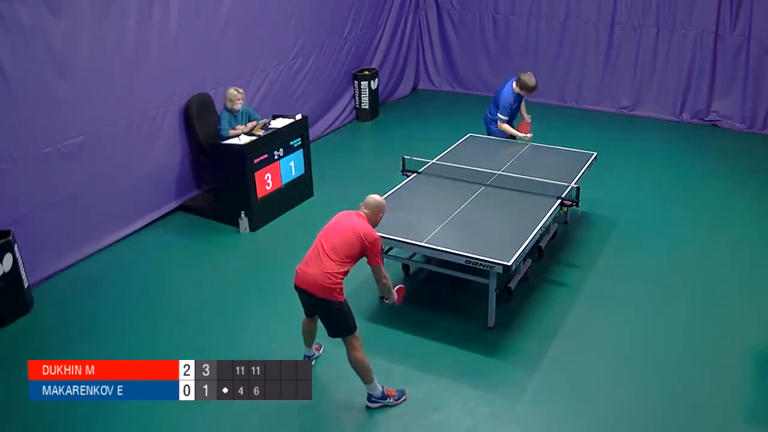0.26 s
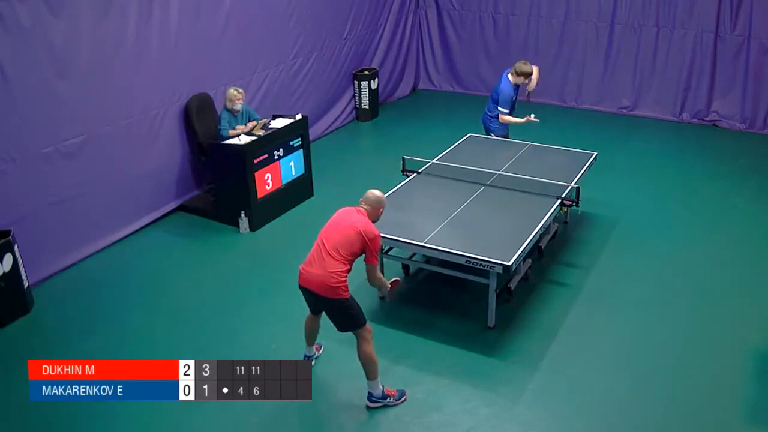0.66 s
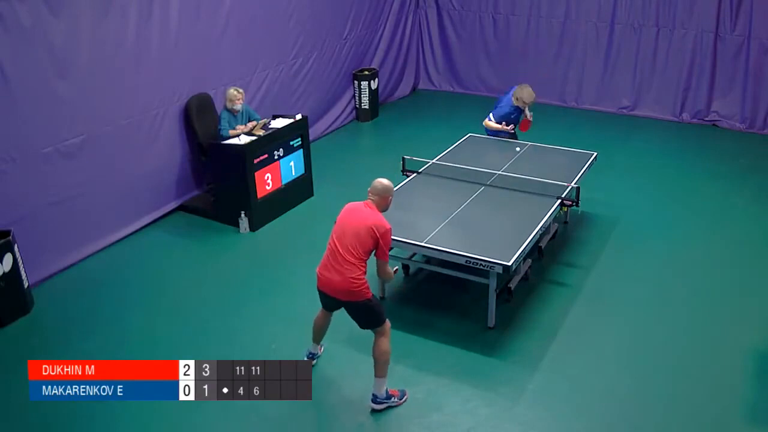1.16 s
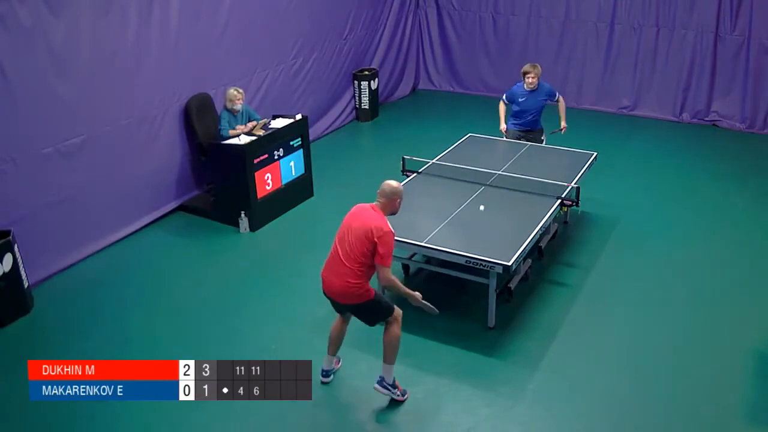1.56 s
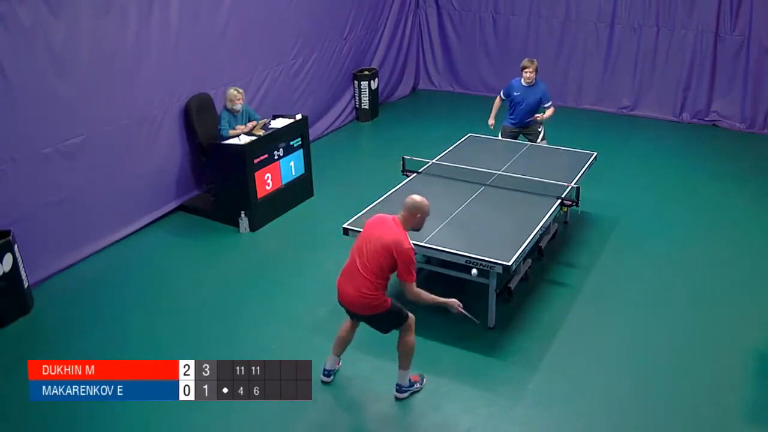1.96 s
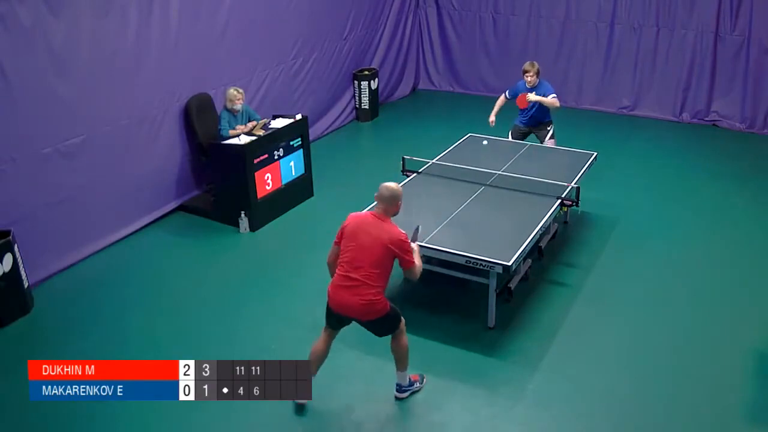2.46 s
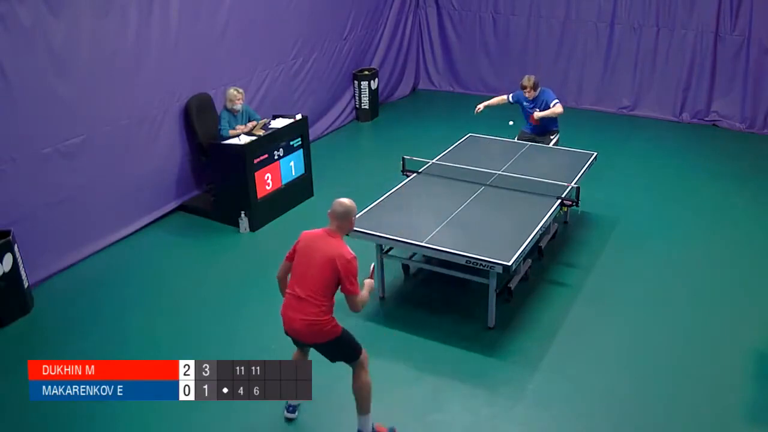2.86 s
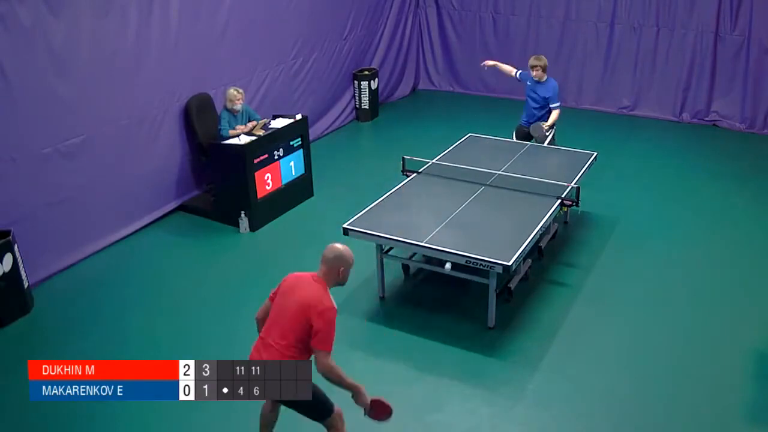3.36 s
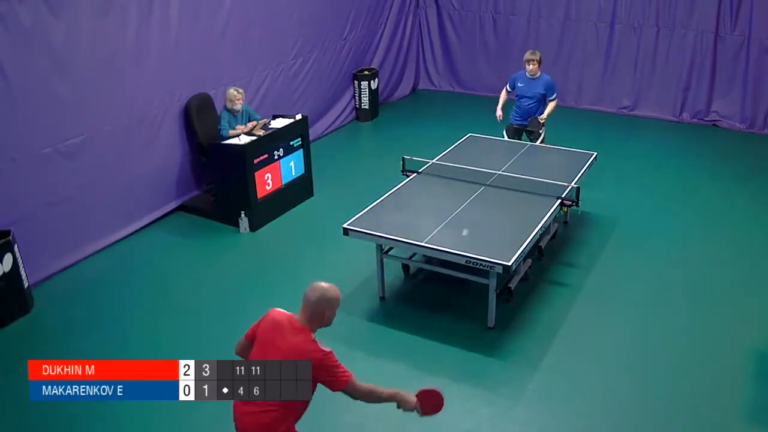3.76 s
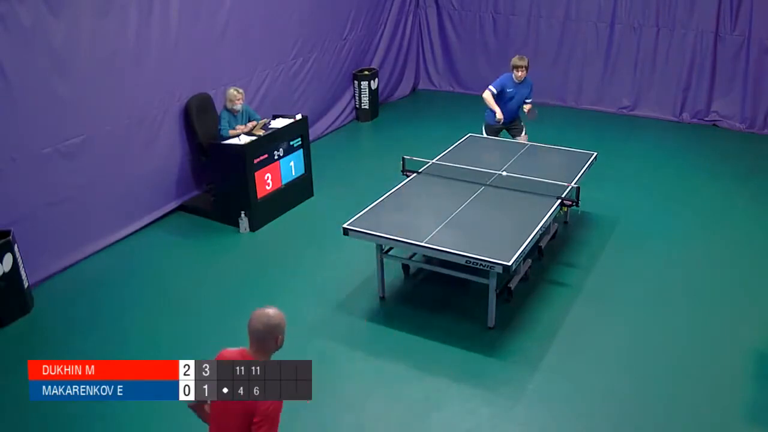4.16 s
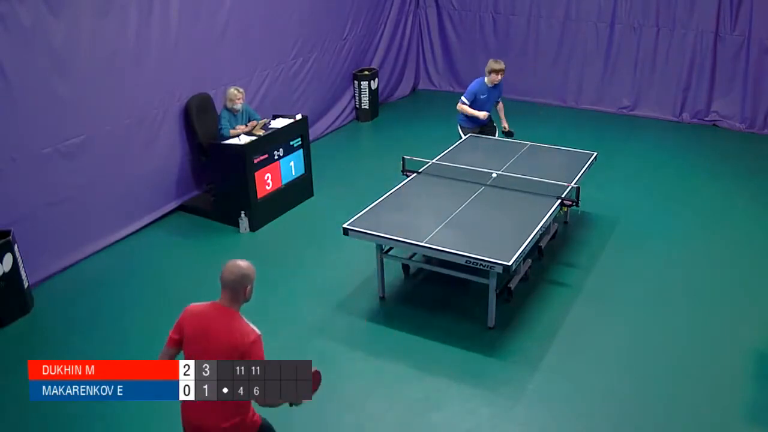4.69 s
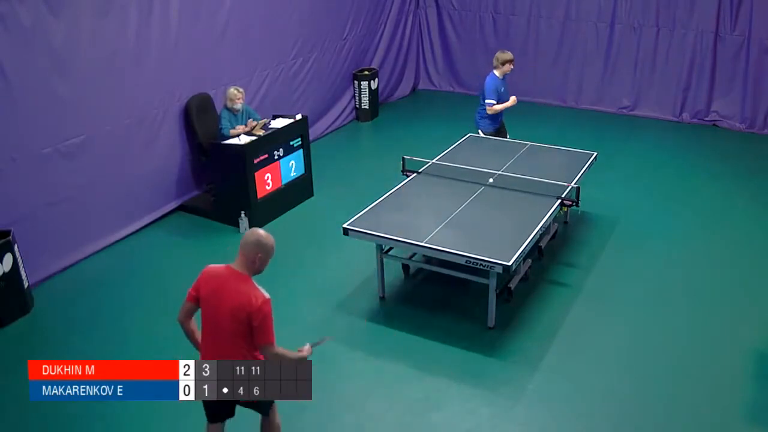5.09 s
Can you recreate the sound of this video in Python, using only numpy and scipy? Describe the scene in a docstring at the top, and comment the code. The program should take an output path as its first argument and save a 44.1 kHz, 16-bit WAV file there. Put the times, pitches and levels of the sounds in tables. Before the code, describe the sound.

In a reverberant sports hall with low ventilation rumble, soles brush faintly, then a soft serve tap is followed at once by a heavy stamp on sprung boards. The ball clicks on table and bats, strokes growing firmer, with short high rubber squeaks, scuffs and two light footfalls. After the last hard knock it bounces weakly on the table. The microphone is some distance away, slightly dull on top.

```python
"""A table tennis rally in a curtained sports hall, heard from above one corner over low ventilation rumble (noise).
Soles brush the floor (swells of noise), then the first bat stroke knocks (decaying sines) and the server
stamps on the sprung floor (ringing boards, slap and boom). The ball clicks between table and bats (decaying
sines with scattered reflections) amid squeaks (gliding tones), scuffs and light thumps of rubber soles.
After the last stroke it bounces out on the table top, with a last squeak and scuff."""
import sys
import numpy as np
from scipy import signal
from scipy.fft import rfft, irfft
from scipy.io import wavfile

SR = 44100
rng = np.random.default_rng(int(sys.argv[2]) if len(sys.argv) > 2 else 0)


def dump_mix(stems):
    """Bounce the given channels to the path in sys.argv[1] as a 16-bit WAV at rate SR."""
    frames = np.atleast_2d(stems).T  # one column per channel
    limited = np.clip(frames, -1, 1)  # hard clip at full scale
    pcm = np.round(limited * 32767).astype(np.int16)
    wavfile.write(sys.argv[1], SR, pcm)


N = 234900
T = np.arange(N) / SR


def from_db(db):
    """Decibels to gain."""
    return 10 ** (np.asarray(db) / 20)


def at_hz(points, hz):
    """Read a table on a log-frequency axis."""
    f, value = np.transpose(points)
    return np.interp(np.log(np.maximum(hz, 1)), np.log(f), value)


def noise(spectrum, tilt_db=0):
    """Noise of a given colour, tilted by dB per octave and scaled to rms 1."""
    hz = np.maximum(np.arange(N // 2 + 1) * SR / N, 1)
    gain = from_db(at_hz(spectrum, hz) + tilt_db * np.log2(hz))
    x = irfft(rfft(rng.standard_normal(N)) * gain, N)
    return x / x.std()


def wobble(size, rate_hz):
    """Random points of spread 1 joined by straight lines; the last of the 400 points is held."""
    return np.interp(T[:size] * rate_hz, np.arange(400), rng.standard_normal(400))


def add(track, s, sound):
    """Mix a sound in at a time."""
    at = max(round(s * SR), 0)
    track[at:at + len(sound)] += sound[:N - at]


def ring(modes):
    """Decaying sines of a struck body, alternating in polarity."""
    t = T[:SR // 3]
    total = 0
    for k, (hz, db, t60) in enumerate(modes):
        total = total + from_db(db - 60 * t / t60) * np.sin(2 * np.pi * hz * t) * (-1) ** k
    return total


def burst(s, rise, t60):
    """Envelope that swells and dies away."""
    age = np.maximum(T - s, 0)
    return (1 - np.exp(-age / rise)) * from_db(np.maximum(-60 * age / t60, -200))


def arch(u, power):
    """Pressure of a sliding sole, for u from 0 to 1."""
    return np.maximum(np.sin(np.pi * np.clip(u, 0, 1)), 0) ** power


def contact(x, edge_hz):
    """The shell of the ball flattens for a moment, which rounds off the click."""
    return signal.sosfilt(signal.butter(2, edge_hz, fs=SR, output="sos"), x)


def scatter(knock, share_db, t60):
    """Net, frame, floor and players throw back a quick cluster of reflections, different from each spot."""
    t = T[:SR // 20]
    cluster = rng.standard_normal(len(t)) * from_db(-60 * t / t60)
    # share_db sets the cluster against the direct knock, a single spike at t = 0
    cluster = from_db(share_db) * cluster / np.sqrt(np.sum(cluster ** 2)) + (t == 0)
    return signal.fftconvolve(knock, cluster)[:len(knock)] / np.sqrt(np.sum(cluster ** 2))


# Ball on a bat. Each row: start in seconds, level in dB, pitch of the blade in Hz, firmness of the stroke 0-1.
BAT_HITS = [(1.392, -52, 1218, 0.13), (2.368, -38, 855, 0.73), (3.3194, -32, 1173, 0.89),
            (3.9066, -30.5, 1023, 1)]
# Modes of bat with ball, before firmness shapes them.
# Each row: multiple of the blade pitch, level in dB, base ring time (60 dB decay) in seconds.
BAT_MODES = [(1, 3.5, 0.036), (0.699, -2.5, 0.024), (1.329, 4, 0.015), (1.62, 1, 0.023), (2.601, 3, 0.0025),
             (4.4, -34, 0.0046)]
# a grazing stroke lets the blade sing; a firm one damps it and wakes the side modes
GRAZE_RING, FIRM_RING = 4.9, 0.3  # ring time, relative
GRAZE_SIDE_DB, FIRM_SIDE_DB = -16.5, 3.5  # change in level of the side modes


def bats():
    """A short knock of the blade: the firmer the stroke, the drier and fuller it is."""
    out = np.zeros(N)
    for s, db, blade_hz, firm in BAT_HITS:
        sustain = GRAZE_RING * (FIRM_RING / GRAZE_RING) ** firm
        side_db = GRAZE_SIDE_DB + (FIRM_SIDE_DB - GRAZE_SIDE_DB) * firm
        modes = [(blade_hz * multiple, level + side_db * (k > 0), t60 * sustain)
                 for k, (multiple, level, t60) in enumerate(BAT_MODES)]
        knock = ring(sorted(modes))
        add(out, s, from_db(db) * scatter(knock, share_db=0, t60=0.13))
    return contact(out, edge_hz=5900)


# Ball on the table. Each row: start in seconds, level in dB.
BOUNCES = [(1.9425, -38), (3.0441, -38), (3.5012, -34.5), (4.572, -38.5), (4.8984, -42.5), (5.2132, -41)]
# Modes of table top with ball. Each row: frequency in Hz, level in dB, ring time (60 dB decay) in seconds.
TABLE_MODES = [(457, -13.5, 0.042), (760, -4.5, 0.015), (986, -3.5, 0.014), (1288, 0.5, 0.015),
               (1529, -4.5, 0.028), (1727, -4, 0.012), (3200, -15, .007), (4450, -22.5, 0.0058)]
ECHO_S, ECHO_DB = 0.0155, 3  # delay, and level against the first knock


def bounces():
    """The ball knocks on the table top; a hard surface nearby throws the click back."""
    out, knock = np.zeros(N), ring(TABLE_MODES)
    for s, db in BOUNCES:
        add(out, s, from_db(db) * scatter(knock, share_db=1.5, t60=0.051))
        echo = scatter(knock, share_db=-0.5, t60=0.038)
        add(out, s + ECHO_S, from_db(db + ECHO_DB) * echo)
    return contact(out, edge_hz=5600)


# Feet landing. Each row: start in seconds, level of the boards in dB.
STEPS = [(1.4517, -18), (2.9329, -48), (3.049, -52.5)]
# Sprung floor under a shoe, before softness tilts it.
# Each row: frequency in Hz, level in dB, ring time (60 dB decay) in seconds.
FLOOR_MODES = [(155, -13.5, 0.18), (197, -9.5, 0.11), (246.7, -2, 0.05), (328, -1.5, 0.075),
               (372.5, -2.5, 0.074), (427, -0.5, 0.098), (513, 0, 0.019)]
# Slap of a sole with the crowded short modes of the boards. Each row: frequency in Hz, relative dB per Hz.
SLAP = [(130, -7.5), (200, 19.5), (310, 12.5), (420, 12.5), (545, 19), (640, -2.5), (1100, -2), (1550, -4),
        (2000, -11.5), (3200, -8), (4200, -16), (5200, -15), (7000, -23.5), (8000, -56.5)]
# Boom of the whole floor. Each row: frequency in Hz, relative dB per Hz.
BOOM = [(20, -13), (35, -3.5), (60, 3.5), (90, -11), (140, -41), (400, -72.5)]
# reference stamp: level, tilt toward the low modes (dB per octave), slap of the sole, boom of the floor
STAMP_DB, STAMP_SOFT_DB, STAMP_SLAP_DB, STAMP_BOOM_DB = -18.5, 2.5, -23, -49
# for each dB that a step is lighter: more tilt, less slap, less boom
SOFT_PER_DB, SLAP_PER_DB, BOOM_PER_DB = 0.2537, 1.05, 0.3


def steps(heel_db=-14, heel_slap_db=-19, heel_lead=0.00796, slap_lag=0.00053, press=0.00085, pivot_hz=400):
    """The heel touches, the sole slaps flat, the boards ring and the whole floor booms after them."""
    out, slap, boom = np.zeros(N), noise(SLAP), noise(BOOM)
    for s, db in STEPS:
        lighter_db = STAMP_DB - db
        # a soft landing favours the low modes
        soft_db = STAMP_SOFT_DB + SOFT_PER_DB * lighter_db
        modes = [(hz, level - soft_db * np.log2(hz / pivot_hz), t60) for hz, level, t60 in FLOOR_MODES]
        boards = ring(modes)
        boards = boards * (1 - np.exp(-T[:len(boards)] / press))
        add(out, s - heel_lead, from_db(db + heel_db) * boards)
        add(out, s, from_db(db) * boards)
        heel = from_db(heel_slap_db) * burst(s - heel_lead, rise=0.00091, t60=0.76)
        sole = burst(s + slap_lag, rise=0.00021, t60=0.15)
        out += from_db(STAMP_SLAP_DB - SLAP_PER_DB * lighter_db) * slap * (heel + sole)
        out += from_db(STAMP_BOOM_DB - BOOM_PER_DB * lighter_db) * boom * burst(s, rise=0.05, t60=1.1)
    return out


# A sole grips and squeaks. Each row: start in seconds, length in seconds, settled pitch in Hz,
# level in dB before mixing, level of the overtones in dB against the fundamental.
SQUEAKS = [(2.03, .044, 2303, -55.5, -4.5), (2.671, 0.061, 2540, -45.5, -18.5),
           (3.299, 0.015, 3220, -35.5, -22), (3.32, 0.016, 2840, -44, -4), (3.486, 0.024, 2652, -35, -16.5),
           (3.504, .03, 2391, -33.5, -14), (3.778, 0.06, 2485, -42.5, -18),
           (3.811, 0.037, 2395, -38.5, -6.5), (3.959, 0.0441, 2910, -45.5, -8.5),
           (3.985, 0.0355, 2842, -34.5, -21.5), (4.521, 0.085, 2787, -48, -24),
           (4.94, 0.03, 1890, -52.5, -14)]
# Rasp of brushing rubber, also heard in the scuffs. Each row: frequency in Hz, relative dB per Hz.
BRUSH = [(300, -19.5), (900, 2), (1700, -2), (2400, -6.5), (3100, -2), (3450, 1.5), (3900, -5.5),
         (4700, -8), (7000, -20.5), (8000, -30)]
SQUEAK_SHARP, SQUEAK_BRAKING = 0.0703, 2.237  # starts sharp by this share, then sinks along this power
ROUGH_PER_S = 12.2  # the longer the slide, the more unevenly the rubber grips


def squeaks(jitter=0.056, flutter_db=5.0, slip_hz=600, third_db=-16, rasp_db=-29):
    """Rubber sticks and slips, its pitch sinking as the foot brakes; long slides are rough, short ones cleaner."""
    out, rasp = np.zeros(N), from_db(rasp_db) * noise(BRUSH)
    for s, length, settled_hz, db, overtone_db in SQUEAKS:
        u = T[:int(length * SR)] / length
        rough = min(ROUGH_PER_S * length, 1)
        glide = 1 + SQUEAK_SHARP * (1 - u) ** SQUEAK_BRAKING
        hz = settled_hz * glide * (1 + jitter * rough * wobble(len(u), slip_hz))
        phase = 2 * np.pi * np.cumsum(hz) / SR
        overtones = np.sin(2 * phase) + from_db(third_db) * np.sin(3 * phase)
        tone = np.sin(phase) + from_db(overtone_db) * overtones
        grip = arch(u, power=0.51) * from_db(db + flutter_db * rough * wobble(len(u), slip_hz))
        rasp_here = np.roll(rasp, -int(s * SR))[:len(u)]
        add(out, s, grip * (tone + rasp_here))
    return out


# Soles brushing the floor; a negative start is already under way.
# Each row: start in seconds, length in seconds, level in dB before mixing, tilt in dB per octave.
SCUFFS = [(-.08, 0.12, -55.5, -4.5), (0.5, 0.11, -71, 4), (0.791, 0.19, -65.5, -0.5),
          (2.018, 0.021, -61.5, 4), (2.903, .058, -52, -5), (3.77, 0.06, -45, 13.5),
          (4.855, 0.11, -58.5, -2)]


def scuffs():
    """Soles brush over the floor without gripping: noise that swells with the pressure."""
    out = np.zeros(N)
    for s, length, db, tilt_db in SCUFFS:
        out += from_db(db) * noise(BRUSH, tilt_db) * arch((T - s) / length, power=0.28)
    return out


# Colour of the ventilation. Each row: frequency in Hz, relative dB per Hz.
AIR = [(13, -57), (22, -14), (102, -7), (166, -3), (272, -13), (332, -10), (366, -12.5), (480, -14),
       (557, -22), (890, -17.5), (1230, -24), (1690, -27), (2840, -35.5), (3460, -35), (8000, -53),
       (10400, -100), (17600, -120)]
AIR_DB = -56


def ventilation():
    """Moving air rumbles as steady noise, strongest in the lows."""
    return from_db(AIR_DB) * noise(AIR)


# How long the hall rings. Each row: frequency in Hz, decay time (60 dB) in seconds.
HALL_T60 = [(60, 2.5), (150, 0.71), (400, 0.9053), (1200, 1.43), (2800, 1.16), (7000, 0.93)]
# Colour of its reverberation. Each row: frequency in Hz, relative level in dB.
HALL_COLOUR = [(60, 0.73), (200, 0.76), (500, 1), (1200, 0.94), (3000, 0.34), (7000, -2.15)]


def hall_response(gap=0.0013, build=0.0076, lumpy_db=4.5, blend=0.17):
    """Uneven early reflections merge into a tail that dies at its own rate in each octave."""
    t = T[:SR * 3 // 2]
    lumps = from_db(lumpy_db * np.exp(-t / blend) * wobble(len(t), rate_hz=1300))
    onset = 1 - np.exp(-np.maximum(t - gap, 0) / build)
    spectrum = rfft(rng.standard_normal(len(t)) * lumps * onset)
    bin_hz = np.arange(len(spectrum)) * SR / len(t)
    octave = np.log2(np.clip(bin_hz, 62.5, 8000) / 62.5)
    tail = 0
    for k, hz in enumerate(62.5 * 2 ** np.arange(8)):
        # neighbouring octave bands crossfade
        band = irfft(spectrum * np.maximum(1 - abs(octave - k), 0), len(t))
        tail = tail + band * from_db(at_hz(HALL_COLOUR, hz) - 60 * t / at_hz(HALL_T60, hz))
    return tail / np.sqrt(np.sum(tail ** 2))


def scene(ball_wet_db=-4.0, bat_wet_db=-1.5, step_wet_db=-1.5, squeak_wet_db=0.5,
          squeak_direct_db=0.16, scuff_direct_db=-4):
    """Ball, bats and feet reach the microphone directly and through the hall; the ventilation lies beneath."""
    bat, table = bats(), bounces()
    feet, brush, squeak = steps(), scuffs(), squeaks()
    sent = (from_db(bat_wet_db) * bat + from_db(ball_wet_db) * table + from_db(step_wet_db) * feet
            + from_db(squeak_wet_db) * squeak + brush)
    hall = signal.fftconvolve(sent, hall_response())[:N]
    direct = bat + table + feet + from_db(squeak_direct_db) * squeak + from_db(scuff_direct_db) * brush
    return (direct + hall + ventilation())[None]


CUTOFF_HZ = 7500


def record(dry):
    """A narrow-band microphone cuts the top steeply."""
    return signal.sosfilt(signal.ellip(10, 0.2, 80, CUTOFF_HZ, fs=SR, output="sos"), dry)


dry = scene()
out = record(dry)
dump_mix(out)
```